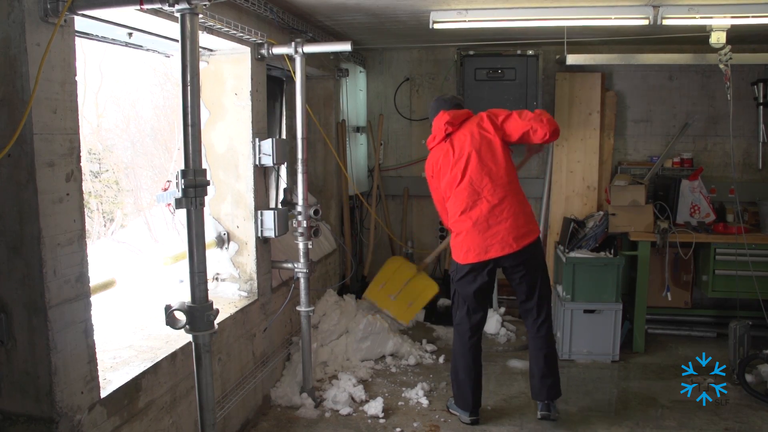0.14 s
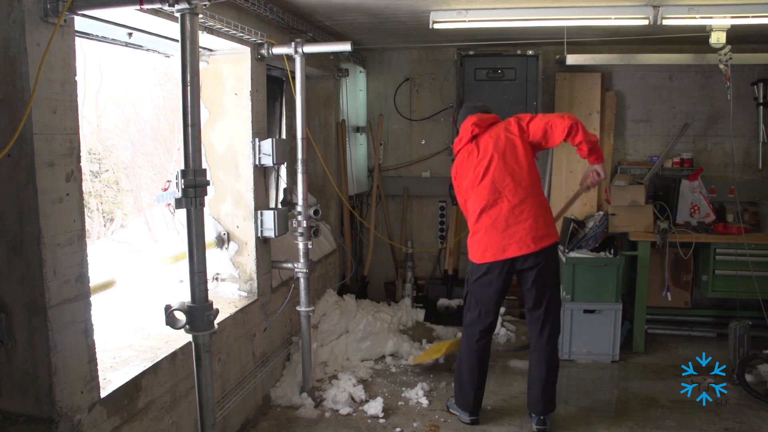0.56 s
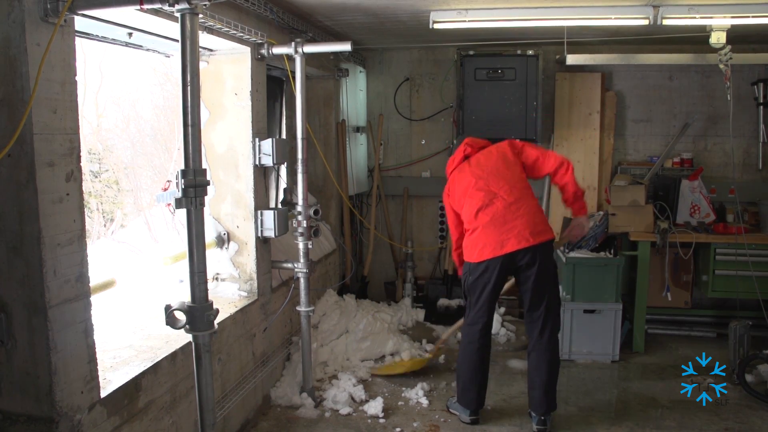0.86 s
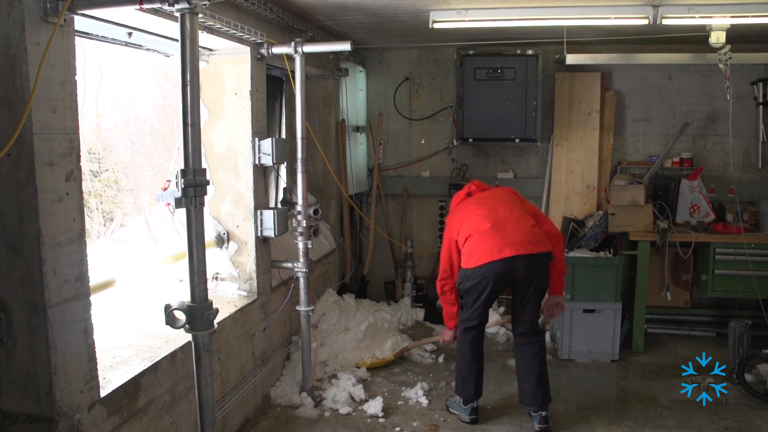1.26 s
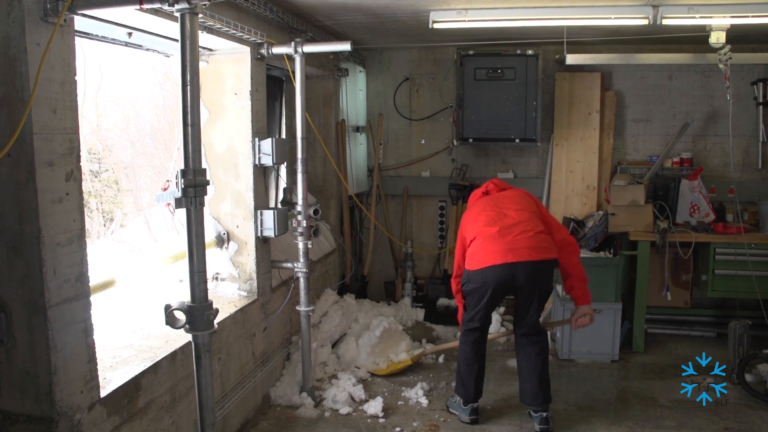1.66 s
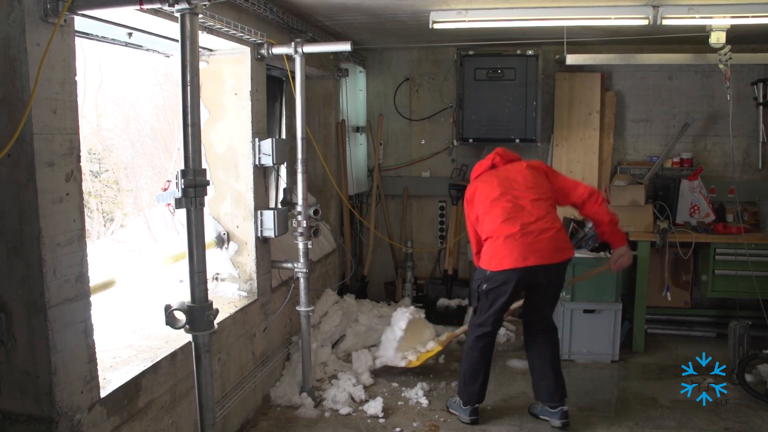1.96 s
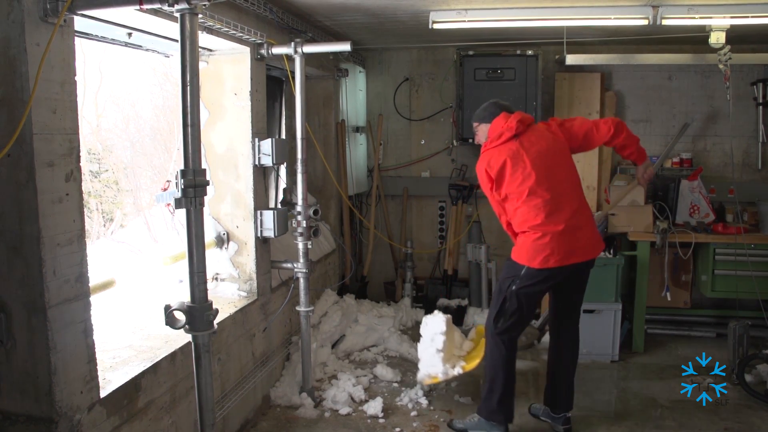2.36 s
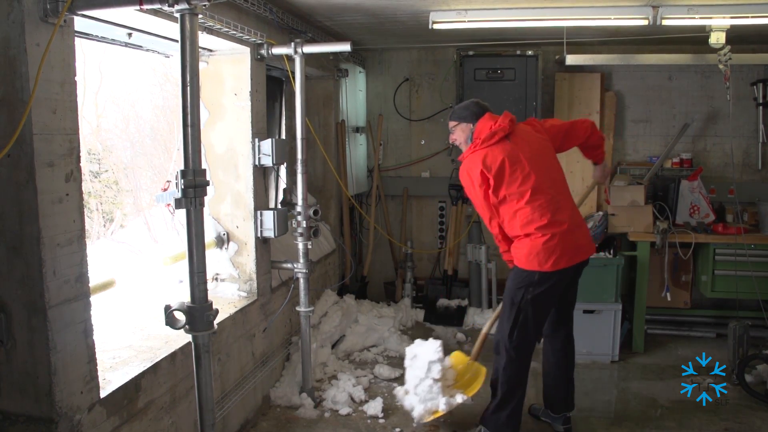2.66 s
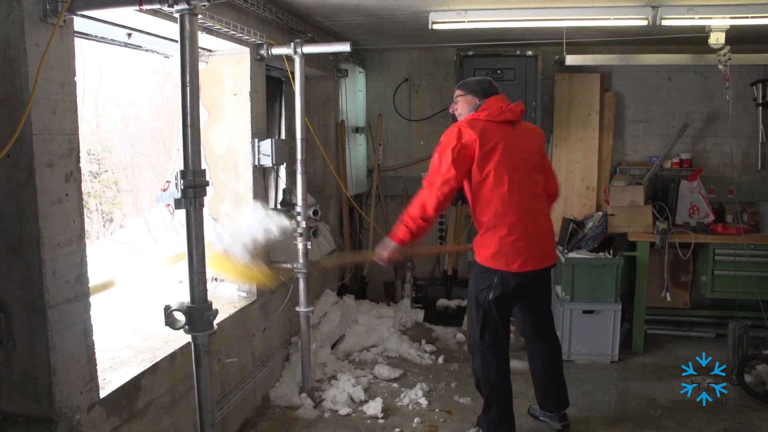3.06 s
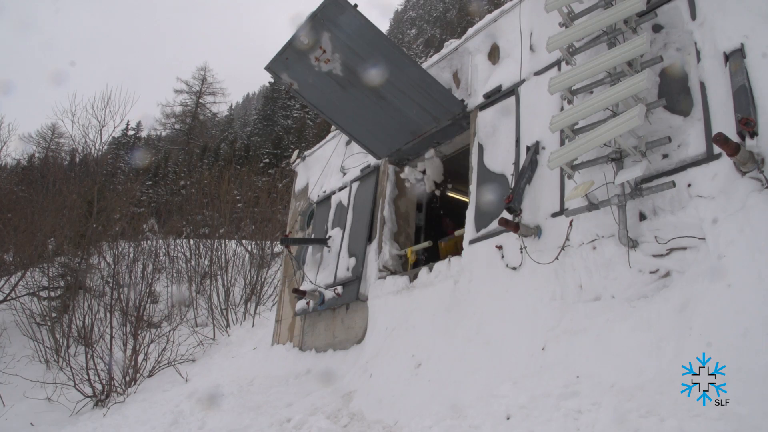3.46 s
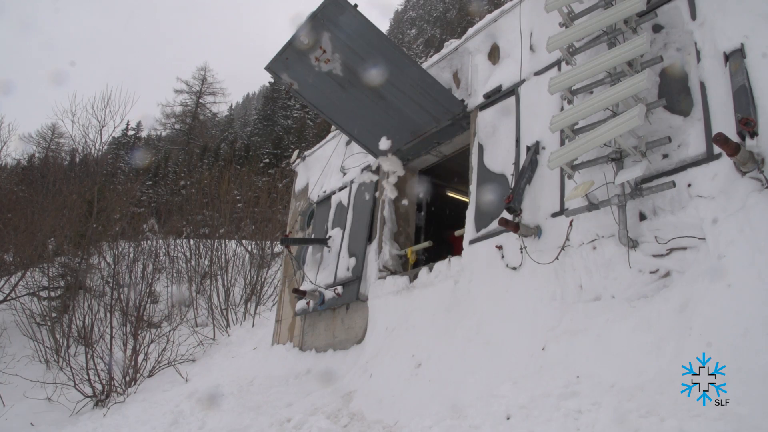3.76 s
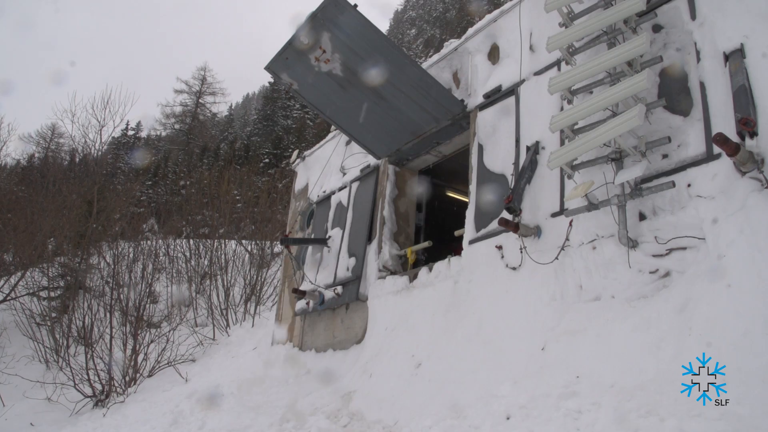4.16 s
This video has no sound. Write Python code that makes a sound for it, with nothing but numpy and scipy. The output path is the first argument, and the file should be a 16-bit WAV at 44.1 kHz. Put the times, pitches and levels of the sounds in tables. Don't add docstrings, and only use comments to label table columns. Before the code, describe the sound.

A hard-walled concrete store room with soft room air and a very faint lamp hum, heard through a small bass-light camera microphone. From 0 to 0.15 s, snow crumbles and ticks with tiny squeaks, jacket cloth rubs, and a bumped steel prop rings faintly. Around 0.3 s a sleeve swishes with a dry snap; a softer snap follows at 0.46 s. From 0.8 to 1.08 s a plastic shovel scrapes over gritty concrete, by far the loudest event: a coarse, hollow, stuttering rasp of rapid catches, ending abruptly into a half-second room tail. A tick comes at 1.15 s, then near quiet with a soft scatter at 1.5 s. At 2.12 s there is a short cloth crinkle, tick and knock. Light swishes rise around 2.9 s, and a clearer rustle with a lump thud and knocks comes at 3.25-3.4 s. Faint crumbling and knocks surround 3.85 s; small thuds end it near 4.23 s.

```python
import sys
import numpy as np
from scipy import signal
from scipy.fft import rfft, irfft
from scipy.io import wavfile
from scipy.ndimage import uniform_filter1d

SR = 44100
rng = np.random.default_rng(int(sys.argv[2]) if len(sys.argv) > 2 else 0)


def wav_out(sig):
    wavfile.write(sys.argv[1], SR, np.round(np.clip(np.atleast_2d(sig).T, -1, 1) * 32767).astype(np.int16))


def amplitude_ratio(level_db):
    exponent = np.asarray(level_db, float) / 20
    return 10 ** exponent


N = 190413
T = np.arange(N) / SR

# time_s, push_db, grit_db
SCRAPE = [
    (0.8, -27.5, -37),
    (0.81, -9, -21),
    (0.862, -16.5, -21),
    (0.918, -14.5, -26.5),
    (0.936, -13.5, -17),
    (0.946, -16.5, -32),
    (1.06, -23, -27),
    (1.085, -16.5, -40),
]
# start_s, blow_db, sharpness (0 dull to 1 sharp), lip_contact_db
CATCHES = [(.8, -5.5, 0.31, -5), (0.8101, -4.5, 0.75, -1), (.828, -3, 0.31, -8), (.845, -3.5, 0.35, 7),
           (.851, 2, .4, 4), (.865, -5, .75, -4), (0.885, -14, 0.81, -7), (.909, -0.5, 0.18, -3),
           (.922, 6, 0.44, -2), (.931, 1, .78, -3), (.94, 0.5, 0, 5), (.952, 1, 0.4, -16),
           (.962, 0.5, 0.28, -5.5), (0.973, 3.5, 0.48, -1), (.998, -6, 0.72, 8), (1.011, -7, .72, -3),
           (1.015, -4, 0.54, 12), (1.04, -10, 0.4, 10.5), (1.058, -9.5, 0.52, 8.5), (1.076, -5, 0.37, -0.5)]
# pitch_hz, width_hz, level_db
BLADE = [(435, 18, 3), (463, 14, -1), (510.6, 11, -10), (550, 16, -8), (655.4, 32, -2), (773, 25, -1),
         (855, 40, -5.5), (1019, 59, 1.5), (1217, 150, -7.5), (1480, 91, -1.5), (1667, 115, -9.5),
         (2057, 160, -3), (2450, 65, -23), (3230, 59, -8)]
# frequency_hz, density_db (per Hz)
GRIT = [(150, -76.5), (250, -57), (443, -5.5), (585, -11.5), (649, -27), (1040, 0.5), (1350, -8.5),
        (2080, -4), (8040, -21.5), (15800, -35)]
CATCH_RISE_S, CATCH_HOLD_S = 0.0021, 0.0076
BELLY_LOSS_DB, GRIT_LOSS_DB = 13, 26.5
LIP_DB, LIP_GAIN_DB_PER_S = -11.5, 10.5

# peak_s, level_db, rise_s, fall_s (each spans 20 dB)
CRUMBLES = [(.06, -37, 0.12, 0.19), (.28, -59.5, 0.46, 0.093), (0.319, -48, 0.056, 0.055),
            (.47, -60, 0.16, 0.45), (.76, -62, 0.65, 0.19), (1.38, -58, 0.24, 0.11),
            (1.6, -50, 0.299, 0.083), (1.79, -62, 0.11, 0.076), (1.891, -54, 0.0086, 0.023),
            (2.03, -62, 0.22, 0.27), (2.122, -45.5, 0.016, 0.081), (2.3, -58.5, 0.074, .2),
            (2.43, -55, 0.13, 0.04), (2.56, -53.5, 0.12, 0.11), (2.81, -66, 0.21, .5),
            (3.04, -54.5, .5, 0.68), (3.18, -62, 0.34, .2), (3.27, -49.5, 0.056, 0.097),
            (3.36, -57, 0.023, 0.5), (3.55, -56, 0.19, 0.21), (3.686, -53, 0.11, 0.043),
            (3.878, -48, 0.15, 0.28), (4.22, -56, 0.57, 0.34)]
# peak_s, level_db, rise_s, fall_s (each spans 20 dB), crinkle_db
SWISHES = [(0.076, -31.5, 0.12, 0.071, -46), (.325, -38.5, 0.042, 0.076, -41),
           (.459, -53.5, .003, .05, -0.5), (.62, -66, 0.22, 0.22, -1.5), (1.48, -66, 0.014, 0.16, 0),
           (1.59, -59, 0.15, 0.23, -18), (1.8, -60, 0.3, 0.074, -11), (2.1, -53.5, 0.23, .03, -3.5),
           (2.121, -41.5, 0.012, 0.091, -1), (2.295, -52.5, 0.026, 0.061, -3), (2.43, -65, 0.085, 0.077, 0),
           (2.83, -67.5, .03, 0.18, -10), (2.915, -47.5, 0.082, 0.14, 2), (3.18, -49, 0.15, 0.063, -7),
           (3.278, -36, 0.061, 0.11, -4.5), (3.36, -50.5, 0.014, 0.095, -5), (3.556, -67, 0.11, 0.024, -24),
           (3.73, -87, 0.088, .2, -23), (3.88, -54, 0.12, 0.77, 2.5), (4.09, -55, 0.98, 0.096, -21),
           (4.31, -61, 0.11, .2, -18)]
# time_s, level_db
STILL = [(2.45, -1), (2.61, -3), (2.635, -6), (2.715, -6), (2.722, -1), (3.57, -1.5), (3.63, -5.5),
         (3.69, -2.5), (4.14, 1), (4.2, -6), (4.24, -1)]
# frequency_hz, level_db
CLOTH_CRINKLE = [(4500, -32), (7000, 1.5), (9500, 3), (12500, -4.5), (16000, -11)]
REST_CLOTH_DB, REST_CRINKLE_DB = -77.5, -86

# start_s, peak_db, centre_hz, width_share
TICKS = [(0.0444, -26, 3230, 1), (.064, -29, 3060, 0.68), (0.1001, -26, 4180, 0.75), (.3032, -53, 5980, .6),
         (0.313, -30.5, 3840, .57), (.4614, -35.5, 2840, 0.22), (.4774, -51, 3450, .9),
         (1.1463, -26, 3250, 0.78), (1.4067, -50, 4540, .7), (1.48, -43, 3400, 0.65),
         (2.1199, -25, 4580, 0.61), (2.2892, -54.5, 4230, .7), (2.5892, -41, 3070, .6),
         (2.7223, -42, 4760, .3), (2.9088, -49, 5620, .7), (3.0789, -40, 3970, 0.59),
         (3.236, -48, 4910, .7), (3.682, -40.5, 2970, 0.31), (3.716, -43, 3850, 0.33),
         (3.7987, -69, 3130, .7)]
# start_s, peak_db, centre_hz, spread_s
PINGS = [
    (.015, -46, 2870, .019),
    (.045, -36, 2780, .03),
    (.002, -47, 1940, .024),
    (.05, -41, 1850, 0.034),
    (.07, -45, 609, 0.022),
    (.103, -35.5, 1110, 0.019),
    (3.385, -47, 770, 0.032),
    (3.888, -48, 922, .024),
]
# start_s, peak_db, centre_hz, spread_s
KNOCKS = [(.33, -51, 1240, .0085), (1.887, -43, 800, .003), (2.12, -42, 1480, .0083),
          (2.121, -52, 2820, .0084), (2.547, -47.5, 1240, 0.0081), (2.99, -45, 825, 0.0069),
          (3.357, -41.5, 1050, 0.022), (3.358, -42.5, 1550, 0.013), (3.829, -45.5, 560, 0.0092),
          (3.86, -50, 686, 0.035), (4.183, -48, 420, .015)]
# start_s, peak_db, centre_hz, spread_s
THUDS = [
    (1.5, -45, 1700, 0.11),
    (3.252, -37, 840, 0.042),
    (3.275, -45.5, 394, 0.016),
    (3.545, -44.5, 2700, .03),
    (3.925, -41, 1310, 0.03),
    (4.229, -44.5, 198, 0.014),
    (4.232, -38.5, 680, 0.014),
    (4.262, -44, 399, .017),
    (4.289, -47, 600, .006),
]
# start_s, peak_db, centre_hz, spread_s, width_share
SNAPS = [
    (.3165, -31, 4200, .0005, .5),
    (.4592, -41, 4500, .003, 1.2),
    (2.589, -52, 7000, .001, .5),
    (3.8, -49, 12000, .002, .3),
    (2.33, -54, 12000, .002, .3),
]
TICK_SPREAD_S, LOUD_SPREAD_S = 0.0064, 0.01
PING_WIDTH, KNOCK_WIDTH, THUD_WIDTH = 0.044, 0.17, 0.58
DIRECT_DB = -15

# start_s, mode_number, level_db, t60_s
PROP = [(.0091, 6, -52, .5), (0.16, 0, -52, 0.78), (0.12, 6, -55, 0.78), (.41, 0, -57.5, 2.6),
        (0.38, 6, -67.5, 3), (0.084, 1, -49, 1.2), (.11, 2, -48, .5), (.1, 3, -56, 0.15),
        (0.04, 4, -37, 0.15), (0.015, 5, -44, 0.35)]
PROP_HZ = [347, 630, 684, 1125, 2700, 1920, 364]

# peak_s, level_db, rise_s, fall_s
SHUFFLES = [
    (.55, -63, 0.77, .6),
    (3.5, -65.5, 0.33, .5),
    (3.7, -67, 0.11, 0.13),
    (4.15, -65, 0.32, 0.36),
]

# frequency_hz, density_db (per Hz)
AIR = [(18, -46), (30, -22), (43, -48), (81, -24.5), (130, -17.5), (245, -7.5), (302, -15), (362, -5),
       (884, -3), (5840, -13), (9870, -17), (15800, -28.5)]
AIR_DB = -54
# pitch_hz, level_db
HUM = [(91.5, -83.5), (274.5, -78)]
# frequency_hz, t60_s
ROOM_T60 = [(250, 0.57), (660, 0.54), (1740, 0.54), (4590, 0.53), (12100, 0.46)]


def shovel():
    s, push_db, grit_db = np.transpose(SCRAPE)
    lift = np.clip((s[-1] - T) / 0.005, 0, 1)
    belly = lip = amplitude_ratio(np.interp(T, s, push_db) - 13.5) * lift * (T > .8015)
    onset = np.clip((T - .806) / 0.002, 0, 1) ** 2
    high = amplitude_ratio(np.interp(T, s, grit_db) - 6.5) * lift * onset
    grit = grains(2200, 2.6, 0.45)

    for at, blow_db, sharp, contact_db in CATCHES:
        belly_db = blow_db - BELLY_LOSS_DB * sharp
        crack_db = blow_db - GRIT_LOSS_DB * (1 - sharp)
        lip_db = blow_db + contact_db + LIP_DB + LIP_GAIN_DB_PER_S * (at - s[0])
        t = np.maximum(T - at, 0)
        jump = (1 - np.exp(-t / CATCH_RISE_S)) * np.exp(-t / CATCH_HOLD_S)
        belly = belly + jump * amplitude_ratio(belly_db - 11.5)
        lip = lip + jump * amplitude_ratio(lip_db - 8.5)
        high = high + jump * amplitude_ratio(crack_db - 12.5)
        grit[int((at + .0015) * SR)] += 9

    blade = 0
    for k, (hz, width_hz, db) in enumerate(BLADE):
        force = grit * (belly if hz < 600 else lip)
        blade = blade + (-1) ** k * amplitude_ratio(db) * ring(force, hz, width_hz) * np.sqrt(SR / width_hz)

    scale = np.std(colour(grit, GRIT))
    thrum = band(colour(grit * lip, GRIT), 190, 1970) / scale
    crackle = band(colour(grit * high * flicker(150, 2.), GRIT), 1240, 11400) / scale
    return band(amplitude_ratio(-11) * blade + amplitude_ratio(-2.5) * thrum + amplitude_ratio(5) * crackle, 280, 19300, order=4)


def rustle():
    crumble = sum(swell(*row) for row in CRUMBLES)
    rest = amplitude_ratio(3 * np.interp(T, *np.transpose(STILL)))
    rub = rest * amplitude_ratio(REST_CLOTH_DB)
    crinkle = rest * amplitude_ratio(REST_CRINKLE_DB)
    for at, db, rise, fall, crinkle_db in SWISHES:
        swish = swell(at, db, rise, fall)
        rub = rub + swish
        crinkle = crinkle + swish * amplitude_ratio(crinkle_db)

    cloth = grains(6000, 0.84, 1.0)
    snow = unit(band(grains(2500, 0.7, 0.47), 385, 1610)) * crumble * flicker(25.176, 1.85)
    hiss = unit(band(cloth, 1783, 6700)) * rub * flicker(40.85, 1.)
    sheen = unit(colour(cloth, CLOTH_CRINKLE)) * crinkle
    return amplitude_ratio(-3.0) * (snow + hiss + sheen)


def small_hits():
    ticks = []
    for at, db, hz, width in TICKS:
        spread = TICK_SPREAD_S + LOUD_SPREAD_S * amplitude_ratio(db + 25) ** 2
        ticks.append((at, db, hz, spread, width))
    knocks = []
    for rows, width in ((PINGS, PING_WIDTH), (KNOCKS, KNOCK_WIDTH), (THUDS, THUD_WIDTH)):
        knocks += [(*row, width) for row in rows]
    return bursts(ticks, 3.2, -6.0) + bursts(knocks, 4.6, -1.36)


def cloth_snaps():
    return bursts(SNAPS, 5.0, 0)


def prop():
    out = 0
    for at, mode, db, t60 in PROP:
        t = np.maximum(T - at, 0)
        hz = PROP_HZ[int(np.clip(round(mode), 0, 6))]
        envelope = np.exp(-np.log(1000) * t / t60) * np.clip(t / .012, 0, 1)
        out = out + amplitude_ratio(db) * np.sin(2 * np.pi * hz * T) * envelope * flicker(13, 2.8)
    return out


def boots():
    level = sum(swell(*row) for row in SHUFFLES)
    return unit(band(grains(900, 1.2, 1.0), 246, 465)) * level * flicker(15, 1.2)


def air():
    hum = sum(amplitude_ratio(db + 1) * np.sin(2 * np.pi * hz * T) for hz, db in HUM)
    bed = unit(colour(rng.standard_normal(N), AIR))
    dull = band(bed, 10, 1094)
    rub = (bed - dull) * amplitude_ratio(np.interp(T, *np.transpose(STILL)))
    return amplitude_ratio(AIR_DB - 3.5) * (dull + rub) * flicker(11, 1.0) + hum


def room(x, wet_db, count=3):
    t, out = T[:SR], x
    hz, t60 = np.transpose(ROOM_T60)
    for k in range(count):
        tail = 0
        for f in 125 * 2 ** np.arange(0, 7.1, .5):
            fall = np.exp(-np.log(1000) * t / np.interp(np.log(f), np.log(hz), t60))
            tail = tail + band(rng.standard_normal(SR), f / 2 ** .25, f * 2 ** .25) * fall
        tail = tail * np.clip(t / 0.004, 0, 1)
        tail = tail / np.sqrt(np.sum(tail ** 2))
        share = np.sqrt(2 / count) * np.cos(np.pi * (9 * T - k / count))
        out = out + amplitude_ratio(wet_db) * signal.fftconvolve(x * np.abs(share), tail)[:N]
    return out


def bursts(table, snap, gain_db):
    out, t = np.zeros(N + 8192), T[:8192]
    sprays = rng.standard_normal((len(table), 8192))
    for (at, db, hz, spread, width), spray in zip(table, sprays):
        w = 1 + max(width, .02)
        strike = spray * np.exp(-t / max(spread, 5e-4)) + snap * (t == 0)
        hit = band(strike, hz / w, hz * w)
        out[int(at * SR):][:8192] += amplitude_ratio(db + gain_db) * hit / np.abs(hit).max()
    return out[:N]


def grains(per_s, scatter_db, bed):
    size = amplitude_ratio(scatter_db * rng.exponential(size=N)) * rng.standard_normal(N)
    impacts = unit(size * (rng.random(N) < per_s / SR))
    return unit(impacts + bed * rng.standard_normal(N))


def swell(at, db, rise, fall):
    distance = np.maximum((at - T) / max(rise, 1e-3), (T - at) / max(fall, 1e-3))
    return amplitude_ratio(db - 20 * distance)


def flicker(per_s, depth_db):
    k = int(SR / per_s)
    steps = np.repeat(rng.standard_normal(N // k + 1), k)
    return amplitude_ratio(depth_db * unit(uniform_filter1d(steps, k)[:N]))


def ring(x, hz, width_hz):
    r = np.exp(-np.pi * width_hz / SR)
    return signal.lfilter([1 - r, 0, r - 1], [1, -2 * r * np.cos(2 * np.pi * hz / SR), r * r], x)


def colour(x, points):
    hz, db = np.transpose(points)
    f = np.maximum(np.fft.rfftfreq(len(x), 1 / SR), 1)
    gain = amplitude_ratio(np.interp(np.log(f), np.log(hz), db))
    return irfft(rfft(x) * gain, len(x))


def band(x, lo_hz, hi_hz, order=2):
    sos = signal.butter(order, [lo_hz, min(hi_hz, .45 * SR)], "band", fs=SR, output="sos")
    return signal.sosfilt(sos, x)


def unit(x):
    return x / np.sqrt(np.mean(x ** 2) + 1e-18)


def scene():
    cloth = rustle()
    small = small_hits()
    shared = room(shovel() + small + amplitude_ratio(-9.5) * cloth, -4.5)
    near = amplitude_ratio(-9) * cloth + amplitude_ratio(DIRECT_DB) * small + cloth_snaps()
    return (shared + near + prop() + boots() + air())[None]


def band_limit(x):
    return signal.sosfilt(signal.butter(12, 15980, fs=SR, output="sos"), x)


def record(dry):
    rounded = np.tanh(.5 * dry) / .5
    thin = signal.sosfilt(signal.butter(2, 50, "high", fs=SR, output="sos"), rounded)
    mix = signal.sosfilt(signal.ellip(10, .2, 70, 15950, fs=SR, output="sos"), thin)
    return band_limit(mix)


dry = scene()
out = record(dry)
wav_out(out)
```